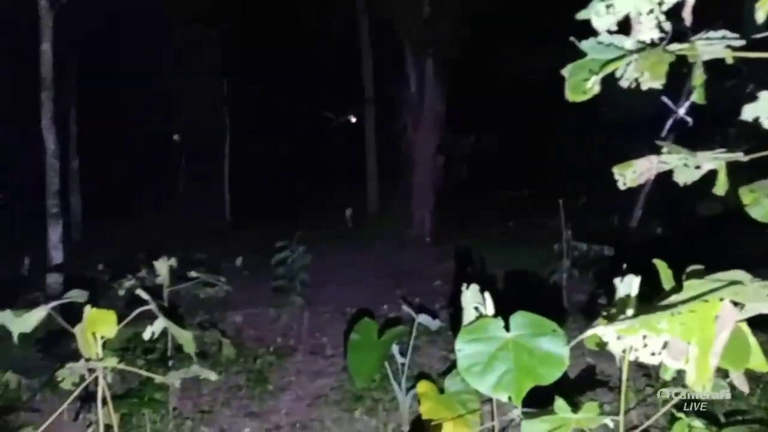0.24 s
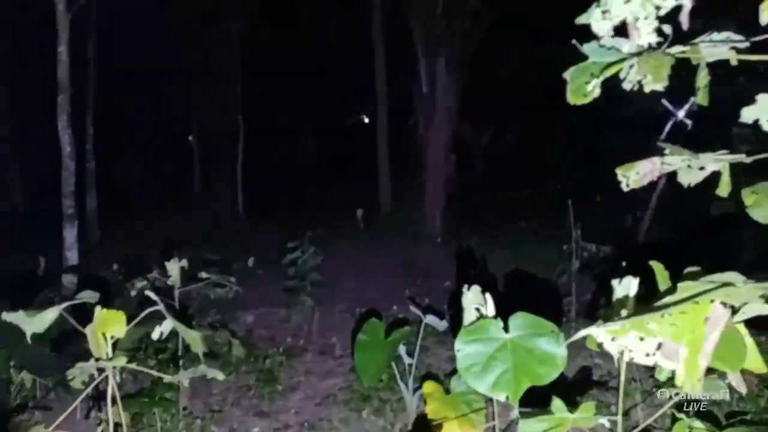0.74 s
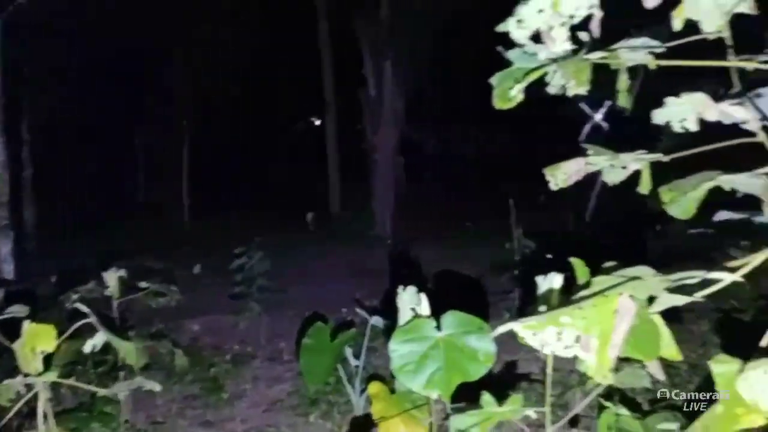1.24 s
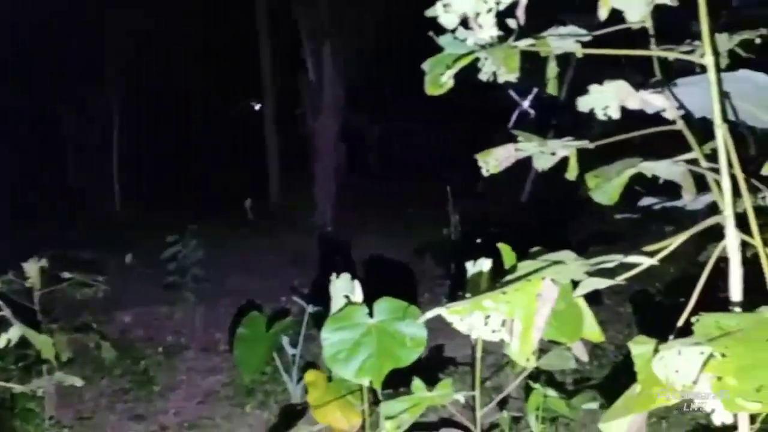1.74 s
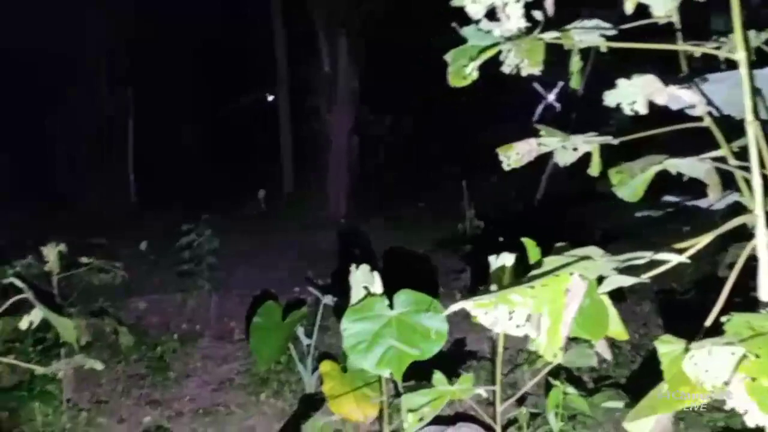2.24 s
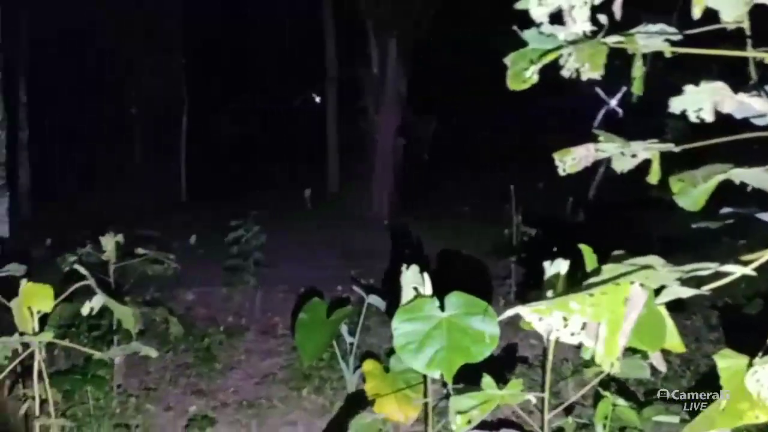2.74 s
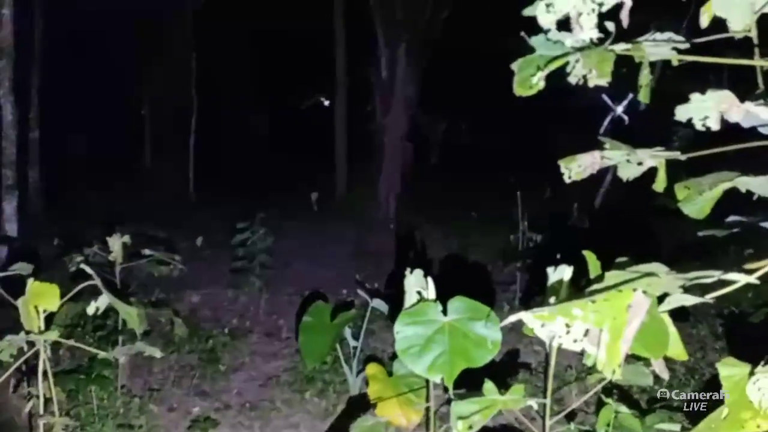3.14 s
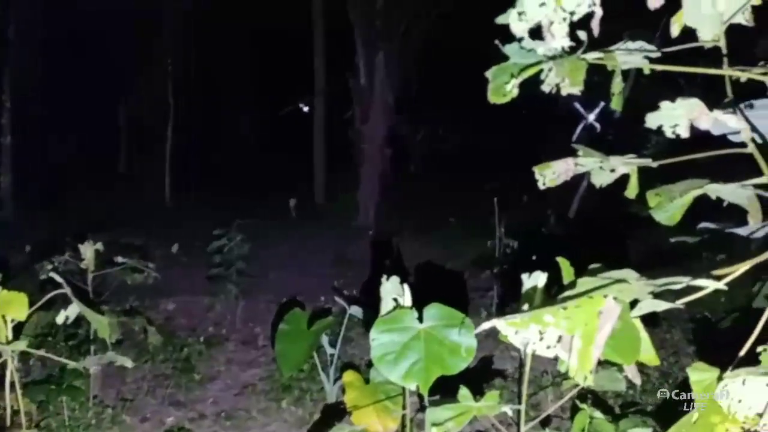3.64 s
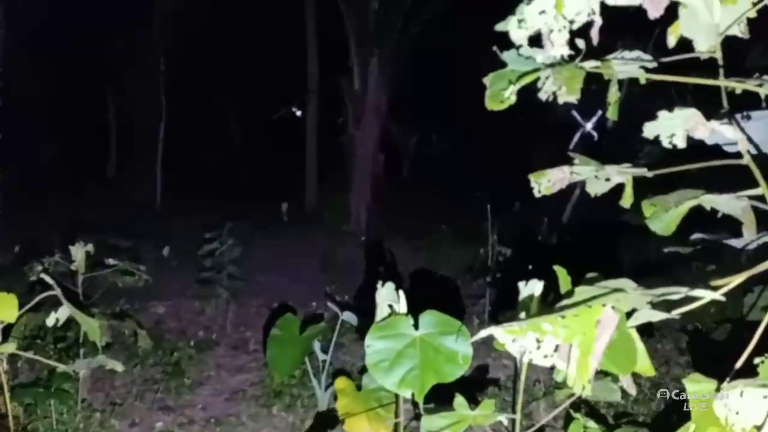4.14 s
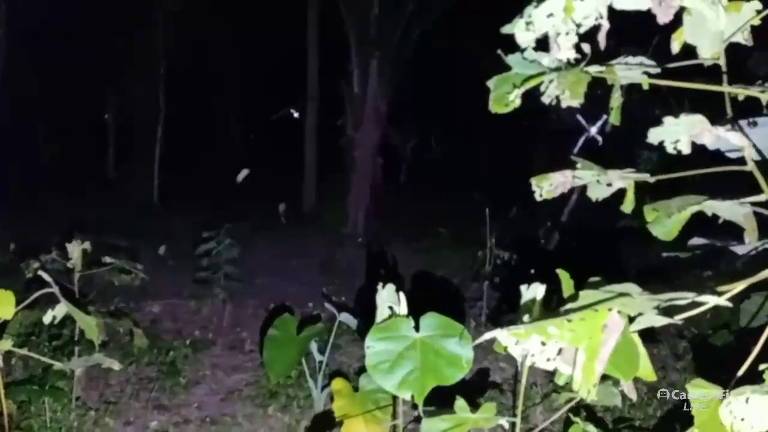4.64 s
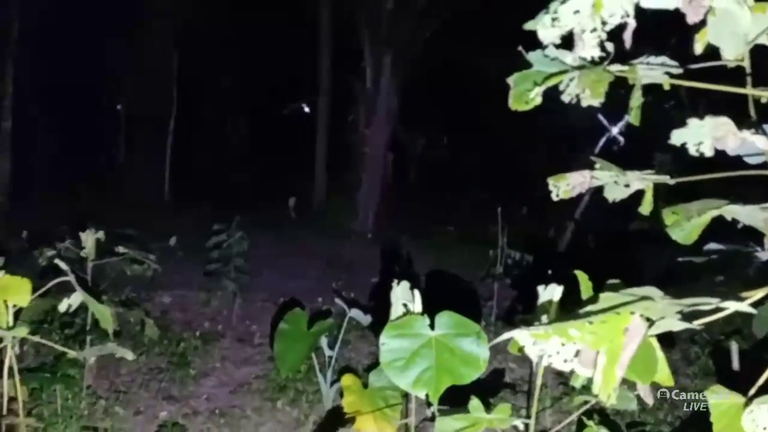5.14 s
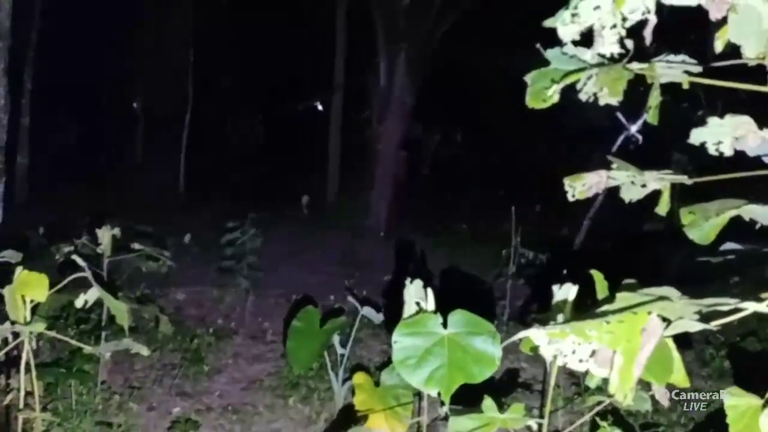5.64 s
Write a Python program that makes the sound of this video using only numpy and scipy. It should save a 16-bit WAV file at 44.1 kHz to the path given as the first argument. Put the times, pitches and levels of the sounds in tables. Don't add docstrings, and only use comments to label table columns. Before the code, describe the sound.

A night wood filled with insects, heard through a handheld microphone. At 0 s the far chorus is a full, bright hiss; within half a second noise suppression pulls it down to a thinner, patchy, slightly watery bed, which recovers a little after 4 s. A tree cricket near 3.6 kHz trills with a fast even flutter until about 1.1 s, again from 1.5 to 3.3 s, and from 3.9 to 5.5 s, followed by brief remnants. A faint low whistle pulses during the first 1.3 s, alongside soft handling creaks before 1 s. Rough, echoing distant chirps repeat until 1.3 s and from 2.5 to 3.9 s. Three loud, sharp, downward-sliding triple-stroke chirps sound close at about 1.7, 1.95 and 2.2 s. Very high dry rasps are sparse at first, cluster near 4.6 s and grow strongest after 5.1 s. Faint low wind puffs bump the microphone, most noticeably around 2 s.

```python
import sys
import numpy as np
from scipy import signal
from scipy.fft import rfft, irfft
from scipy.io import wavfile
from scipy.ndimage import uniform_filter1d

SR = 44100
rng = np.random.default_rng(int(sys.argv[2]) if len(sys.argv) > 2 else 0)


def gain_from_db(level_db):
    decades = np.asarray(level_db, float) / 20
    return 10 ** decades


def wav_out(sig):
    wavfile.write(sys.argv[1], SR, np.round(np.clip(np.atleast_2d(sig).T, -1, 1) * 32767).astype(np.int16))


N = 259704

# t/s, chorus level/dB, grip [0 open - 1 closed]
SUPPRESSOR = [(0, -31.5, 0.25), (.1, -30.5, 0), (.2, -35, 0.3), (.3, -37, 0.21), (.4, -41.5, 0.5),
              (.5, -48, 0.89), (1.4, -48.5, 0.99), (2.2, -48, .98), (4.2, -46.5, 1), (4.85, -43.5, 0.77),
              (5.4, -45.5, 0.99), (5.9, -43.5, 0.78)]


def evened(x):
    return x / np.sqrt(np.mean(x ** 2) + 1e-20)


def read(points, hz):
    f, value = np.transpose(points)
    return np.interp(np.log(hz + 1), np.log(f + 1), value)


def follow(rows, t):
    s, *columns = np.transpose(rows)
    return [np.interp(t, s, c) for c in columns]


def add(mix, s, sound):
    part = mix[round(max(s, 0) * SR):][:len(sound)]
    part += sound[:len(part)]


def resonate(x, hz, width):
    turn = np.exp(2j * np.pi * np.cumsum(hz * np.ones(len(x))) / SR)
    r = np.exp(-np.pi * width / SR)
    return 2 * (turn * signal.lfilter([1 - r], [1, -r], x / turn)).real


def trim(x, edges_hz):
    return signal.sosfilt(signal.butter(3, edges_hz, "bandpass", fs=SR, output="sos"), x)


def phrases(rows, rise_db_per_s, fall_db_per_s):
    t = np.arange(N) / SR
    start, end, db = np.array(rows).T[:3, :, None]
    return db - rise_db_per_s * np.maximum(start - t, 0) - fall_db_per_s * np.maximum(t - end, 0)


def lift_db():
    settled_db, share = -44, 0.83
    chorus_db = follow(SUPPRESSOR, np.arange(N) / SR)[0]
    return share * np.maximum(chorus_db - settled_db, 0)


def wood(x, t60, gap_s, direct_db):
    t = np.arange(SR // 2) / SR
    hits = rng.random(len(t)) < 1500 / SR
    taps = rng.choice([-1., 1.], len(t)) * hits * gain_from_db(-60 * t / t60) * (t > gap_s)
    taps = taps / np.linalg.norm(taps)
    taps[0] = gain_from_db(direct_db)
    return signal.fftconvolve(x, taps / np.linalg.norm(taps))[:N]


def stroke(top_hz, fall, length, second_db, third_db, third_fade_db):
    u = np.arange(round(length * SR)) / (length * SR)
    turn = 2 * np.pi * np.cumsum(top_hz * (1 - fall * u ** 0.763)) / SR
    second = gain_from_db(second_db) * np.sin(2 * turn)
    third = gain_from_db(third_db - third_fade_db * u ** 3) * np.sin(3 * turn)
    edges = np.minimum(u / .15, 1) * np.minimum((1 - u) / .12, 1)
    return (np.sin(turn) + second + third) * edges * gain_from_db(-9. * u)


def chorus():
    # f/Hz, level/dB per Hz
    open_colour = [(30, -41), (140, -32), (240, -30.5), (700, -40), (1400, -35), (2900, -33.5),
                   (4300, -3.5), (5300, -16.5), (6600, -18), (7800, -4), (9300, -22.5), (12500, -19),
                   (14800, -14.5), (15800, -12.5)]
    # f/Hz, level/dB per Hz
    hushed_colour = [(30, -59), (80, -20.5), (300, -23.5), (600, -26.5), (1150, -26), (1380, -20), (1620, -26),
                     (2200, -26.5),
                     (3200, -25.5), (3700, -19.5), (4150, -24.5), (4600, -14), (5150, -16.5), (5800, -11.5),
                     (7500, -4), (8400, -12), (9200, -17.5), (11000, -21.5), (11700, -29.5), (13200, -29.5),
                     (14600, -22), (15750, -17)]
    # f/Hz, share [0-1]
    middle = [(3800, 0), (4100, 0.86), (5300, 0.9), (5700, 0.01)]
    # t/s, level change/dB, half length/s
    tides = [(.15, -5, 0.085), (0.405, 7, 0.034), (.62, -5, .08), (1.48, -9.5, .17), (2.15, 6, 0.1754),
             (2.75, -8.5, 0.1), (3.195, 1.5, 0.17), (3.773, -4, 0.022), (4.32, 3.5, 0.16),
             (4.815, -8.5, .15), (5.332, -2, .1), (5.764, -7.5, 0.034)]
    # f/Hz, depth/dB
    patchy = [(100, 2.1), (1000, .8), (3000, .8), (4200, 3.6), (5600, 3.4),
              (7500, 1.4), (9400, 3.6), (11400, 4.2), (13000, 2.6)]
    frames, hz = N // 128 + 5, np.fft.rfftfreq(512, 1 / SR)
    t = np.arange(frames) * 128 / SR
    grip = np.clip(follow(SUPPRESSOR, t)[1], 0, 1)
    middle_db = sum(db * np.exp(-((t - s) / half) ** 2) for s, db, half in tides)
    middle_db = np.clip(read(middle, hz), 0, 1)[:, None] * middle_db

    real, imaginary, patches = rng.standard_normal((3, 257, frames))
    patches = evened(uniform_filter1d(uniform_filter1d(patches, 3, 0), 34, 1))
    patches = 1.2 * np.where(patches < 0, 1.3 * patches, .8 * patches)
    flicker = evened(uniform_filter1d(rng.standard_normal(frames), 7))
    patches = np.where(hz[:, None] > 11800, .5 * patches + 0.53 * flicker, patches)

    colours = [read(c, hz)[:, None] for c in (open_colour, hushed_colour)]
    open_db, closed_db = [c - 10 * np.log10(np.mean(gain_from_db(2 * c))) for c in colours]
    closed_db = closed_db + read(patchy, hz)[:, None] * patches
    z = (real + 1j * imaginary) * gain_from_db((1 - grip) * open_db + grip * closed_db + middle_db)
    hiss = evened(signal.istft(z, nperseg=512, noverlap=384)[1][:N])
    return hiss * gain_from_db(follow(SUPPRESSOR, np.arange(N) / SR)[0])


def tree_cricket():
    # start t/s, end t/s, level/dB
    trills = [
        (-.1, 1.118, -52),
        (0.087, 0.094, -45.5),
        (1.232, 1.397, -68),
        (1.53, 3.343, -53),
        (1.594, 1.635, -53),
        (3.4, 3.6, -66.5),
        (3.89, 5.54, -52.5),
        (5.648, 5.717, -59),
        (5.842, 5.87, -59),
    ]
    tire_db, wander_hz, wander_db = 0.5, 10., 1.1
    lift = lift_db()
    tiring_db = [np.interp(np.arange(N) / SR, row[:2], [0, -tire_db]) for row in trills]
    level_db = (phrases(trills, rise_db_per_s=253.5, fall_db_per_s=170.) + tiring_db).max(0) + lift
    wobble, breath, upper, low, *slow = rng.standard_normal((6, N))
    sway, drift = (evened(uniform_filter1d(uniform_filter1d(c, 2500), 2500)) for c in slow)
    hz = 3633 + wander_hz * drift
    level_db = level_db + wander_db * sway

    neighbour = evened(resonate(resonate(low, 3450, 200.0), 3450, 200.0))
    neighbour = gain_from_db(-82. + 2.85 * lift) * neighbour

    beats = np.cumsum(23.9 * (1 + .03 * evened(uniform_filter1d(wobble, 3000)))) / SR
    turn = 2 * np.pi * beats
    throb = 1 + .27 * np.cos(turn) + .17 * np.cos(2 * turn) + .12 * np.cos(4 * turn)
    whistle = resonate(resonate(resonate(breath, hz, 225.), hz, 225.), hz, 280.0)
    power = uniform_filter1d(uniform_filter1d(whistle ** 2, 500), 500)
    whistle = evened(whistle / power ** .44)
    overtone = evened(resonate(resonate(upper, 3 * hz, 300.), 3 * hz, 300.))
    song = trim(throb * whistle, [3430, 3860]) + gain_from_db(-19.5) * throb * overtone
    return neighbour + gain_from_db(level_db) * evened(song)


def low_caller():
    # start t/s, end t/s, level/dB
    calls = [
        (-.05, .05, -67),
        (.2, .39, -61.5),
        (.45, .47, -67),
        (.7, .72, -73),
        (.85, .95, -70.5),
        (1.065, 1.1, -65.5),
        (1.2, 1.3, -77),
    ]
    hz = 1652
    level_db = phrases(calls, rise_db_per_s=241, fall_db_per_s=241).max(0) + lift_db()
    whistle = resonate(resonate(rng.standard_normal(N), hz, 72.0), hz, 74.0)
    whistle = whistle / uniform_filter1d(whistle ** 2, 1500) ** .35
    return gain_from_db(level_db) * evened(whistle)


def breeze():
    # start t/s, end t/s, level/dB, centre f/Hz
    gusts = [(-.05, 0.233, -60.5, 134), (.4, 0.504, -67, 131), (.8, .84, -62.5, 124),
             (1.154, 1.31, -61, 154), (1.5, 1.523, -56.5, 97), (1.57, 1.623, -64, 144),
             (1.88, 1.96, -60, 123.5), (2.004, 2.07, -49, 129.7), (2.184, 2.345, -59, 92.72),
             (2.5, 2.515, -59.5, 90), (3.38, 3.422, -71, 118), (3.555, 3.568, -70, 99),
             (3.785, 3.795, -67, 99.8), (3.977, 4.006, -75, 150), (4.167, 4.197, -71, 137),
             (5.13, 5.16, -69, 133), (5.544, 5.572, -61, 106), (5.671, 5.7, -56, 86), (5.88, 5.9, -64, 93)]
    lull_db, shove_db, shove_hz = -80, -10, 51.6
    level_db = phrases(gusts, rise_db_per_s=211, fall_db_per_s=228).max(0)
    level_db = np.maximum(level_db, lull_db)
    centres = [((start + end) / 2, f) for start, end, _, f in gusts]
    hz = 0.93 * follow(centres, np.arange(N) / SR)[0]
    puffs, shove = (evened(resonate(resonate(rng.standard_normal(N), f, 47.0), f, 46.0))
                    for f in (hz, shove_hz))
    return gain_from_db(level_db - 4.0) * (puffs + gain_from_db(shove_db) * shove)


def hand():
    # t/s, level/dB, f/Hz, width/Hz, length/s
    creaks = [
        (0, -69.5, 417, 150, 0.2),
        (0.196, -67.5, 310, 80, .06),
        (0.244, -67.5, 682, 80, 0.046),
        (0.26, -65.5, 424, 60, 0.095),
        (0.261, -68, 965, 80, 0.078),
        (0.397, -62, 437, 300, 0.087),
        (0.479, -71, 310, 60, 0.052),
        (0.714, -68, 250, 150, 0.044),
        (0.867, -73.5, 400, 200, 0.084),
    ]
    out, rub = np.zeros(N), rng.standard_normal((len(creaks), SR // 2))
    for noise, (s, db, hz, width, length) in zip(rub, creaks):
        ring = resonate(resonate(noise, hz, width), hz, width)
        ring = ring[2000:][:round(length * SR)]
        add(out, s, gain_from_db(db + 5.0) * evened(ring) * np.hanning(len(ring)))
    return out


def far_cricket():
    # t/s, level/dB, top f/Hz
    chirps = [(0.022, -55, 4800), (.21, -45.5, 5160), (.4, -46.5, 5240), (0.641, -53.5, 5130),
              (0.849, -43, 4905), (1.035, -42.5, 4880), (1.256, -43.5, 4800), (2.521, -50.5, 4840),
              (2.924, -46, 4980), (3.15, -46, 5020), (3.36, -49, 5010), (3.58, -48, 4980),
              (3.84, -46, 5030), (5.69, -58.5, 4900)]
    out = np.zeros(N)
    leaves = evened(uniform_filter1d(uniform_filter1d(rng.standard_normal(N), 60), 40))
    for s, db, hz in chirps:
        per_s = 28. + 1.6 * (db + 48.5)
        rough = np.clip(.85 - 0.1 * (db + 46.5), 0, 1)
        wing = stroke(1.02 * hz, fall=.135, length=.03, second_db=-34, third_db=-26, third_fade_db=10)
        for k, swell_db in enumerate([15.0 * rough - 17., 3.2, 5.6, 4.0], start=-1):
            at = max(s + k / per_s, 0)
            flutter = 1 - rough + rough * leaves[round(at * SR):][:len(wing)]
            add(out, at, gain_from_db(db + swell_db) * wing * flutter)
    return wood(trim(out, [4230, 5350]), t60=.27, gap_s=.002, direct_db=-6.)


def katydid():
    # t/s, peak level/dB
    rasps = [(0.5994, -57), (1.2266, -59), (2.04, -55), (2.29, -53), (2.564, -58), (2.8794, -58),
             (3.0465, -55), (3.0894, -52), (3.2094, -62), (3.4394, -57), (3.5594, -49), (3.9794, -48),
             (4.35, -45), (4.3894, -51.5), (4.537, -46), (4.6019, -44), (4.6364, -43), (4.6894, -45),
             (4.78, -51), (5.145, -47), (5.194, -39), (5.2979, -43), (5.38, -41), (5.41, -48), (5.48, -43),
             (5.5787, -43), (5.707, -44), (5.7894, -41), (5.8376, -40)]
    # f/Hz, level/dB per Hz
    scratch_colour = [(11200, -21), (11900, -3), (13500, -1), (15000, 4), (15800, -7)]
    hz = np.fft.rfftfreq(N, 1 / SR)
    noise = rng.standard_normal(N)
    scratch = evened(irfft(rfft(noise) * gain_from_db(read(scratch_colour, hz)), N))
    swell = np.zeros(N)
    for s, db in rasps:
        add(swell, s - .012, gain_from_db(db - 9.) * signal.windows.tukey(round(.055 * SR), 1))
    slant = np.exp(-1j * np.pi * 5e-6 * (hz - 12000) ** 2)
    return wood(irfft(rfft(scratch * swell) * slant, N), t60=0.082, gap_s=.003, direct_db=5.0)


def near_cricket():
    # t/s, peak level/dB
    strokes = [
        (1.716, -36),
        (1.751, -30),
        (1.7902, -30.5),
        (1.9454, -34.5),
        (1.978, -30),
        (2.0108, -30),
        (2.1683, -32),
        (2.2, -30),
        (2.2332, -29.5),
    ]
    out = np.zeros(N)
    opening = stroke(5780, fall=0.068, length=0.0072, second_db=-34, third_db=-30, third_fade_db=3)
    add(out, 1.684, gain_from_db(-41.0) * opening)
    wing = stroke(5850, fall=.2, length=.019, second_db=-26, third_db=1.5, third_fade_db=24)
    echo = stroke(5850, fall=.2, length=.019, second_db=-30, third_db=-7, third_fade_db=24)
    for s, db in strokes:
        add(out, s - .001, gain_from_db(db + 1.5) * wing)
        add(out, s + .0038, gain_from_db(db - 3.) * echo)
    return wood(out, t60=.15, gap_s=.005, direct_db=8.)


def scene():
    no_bass = signal.butter(3, 62., "highpass", fs=SR, output="sos")
    singers = signal.sosfilt(no_bass, chorus()) + tree_cricket() + low_caller()
    singers = singers + far_cricket() + katydid() + near_cricket()
    return (singers + breeze() + hand())[None]


def low_pass(x):
    return signal.sosfilt(signal.butter(12, 17000, fs=SR, output="sos"), x)


def record(dry):
    low_cut = signal.butter(2, 70., "highpass", fs=SR, output="sos")
    edge = signal.firwin(801, 15740, window=("kaiser", 10), fs=SR)
    limited = signal.oaconvolve(signal.sosfilt(low_cut, dry), edge[None], "same")
    return low_pass(limited)


dry = scene()
out = record(dry)
wav_out(out)
```